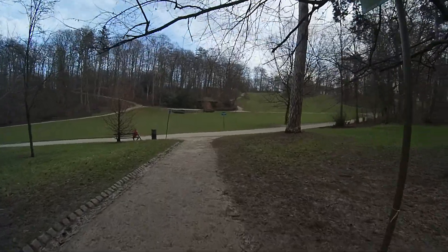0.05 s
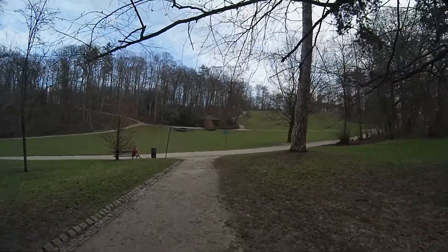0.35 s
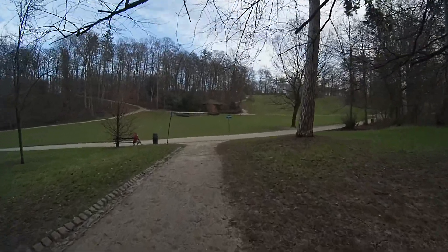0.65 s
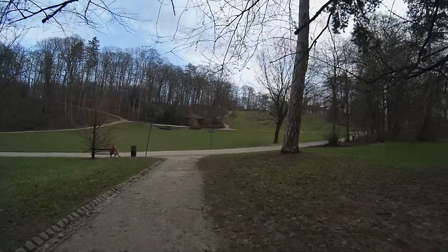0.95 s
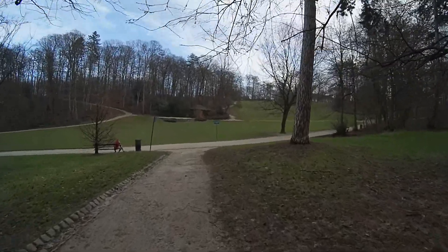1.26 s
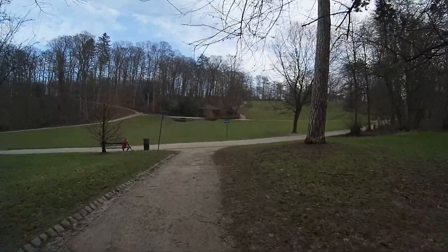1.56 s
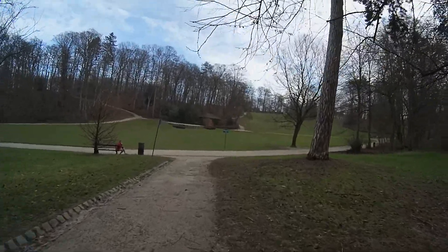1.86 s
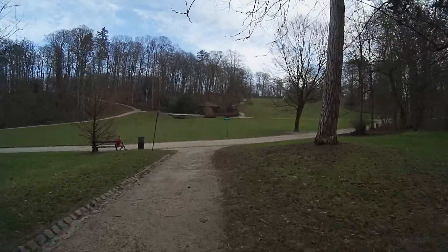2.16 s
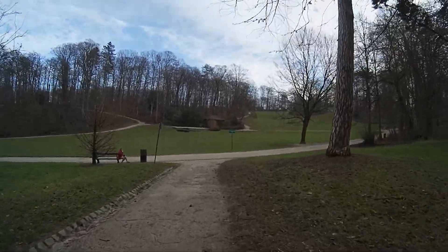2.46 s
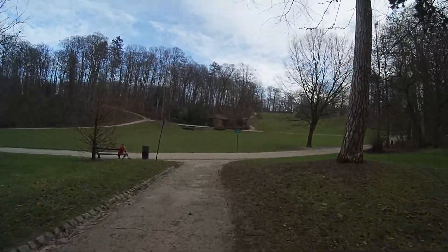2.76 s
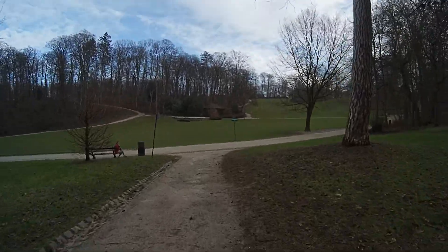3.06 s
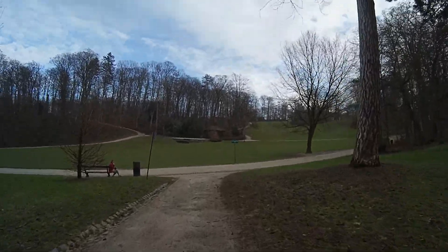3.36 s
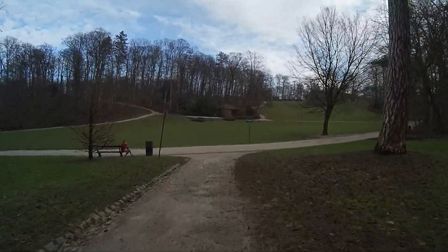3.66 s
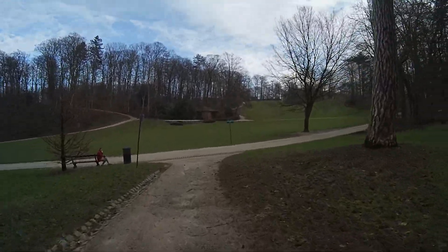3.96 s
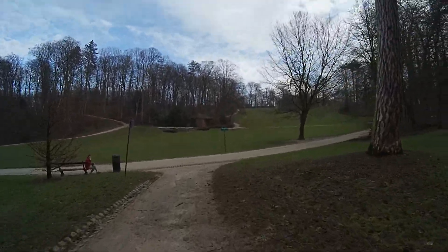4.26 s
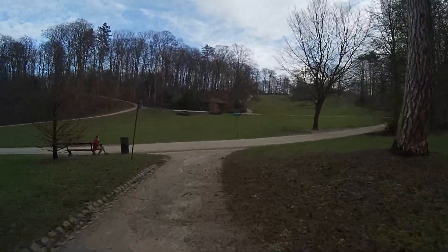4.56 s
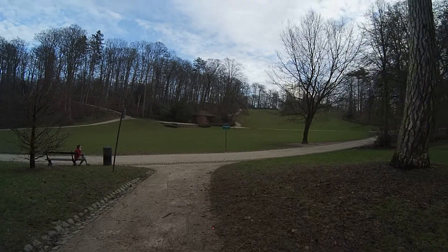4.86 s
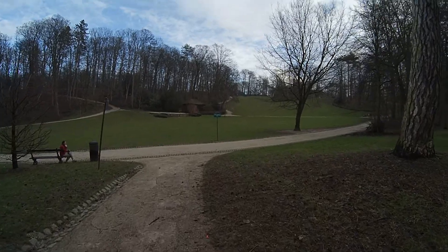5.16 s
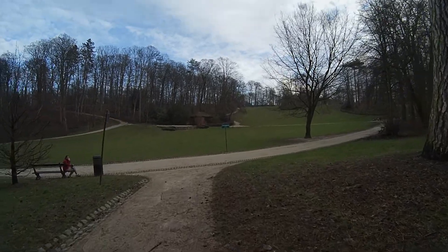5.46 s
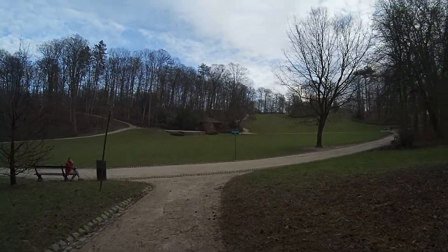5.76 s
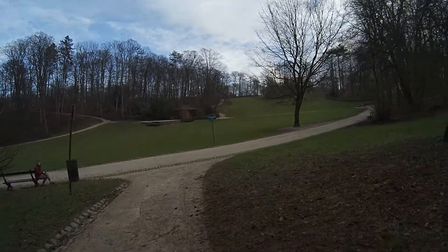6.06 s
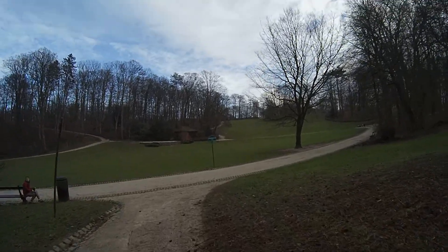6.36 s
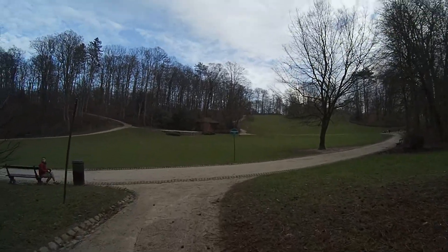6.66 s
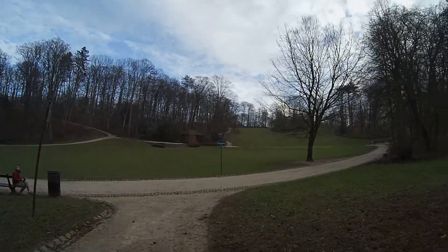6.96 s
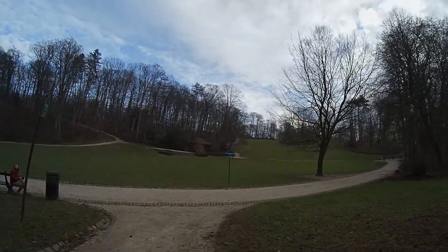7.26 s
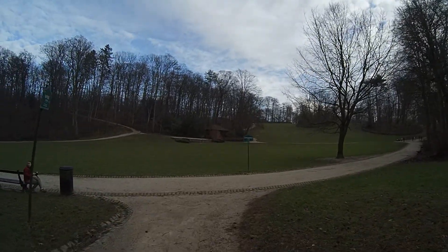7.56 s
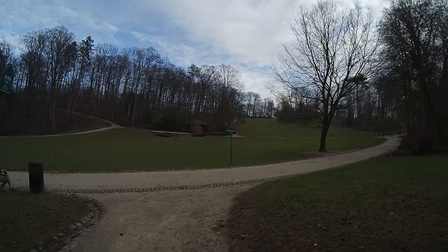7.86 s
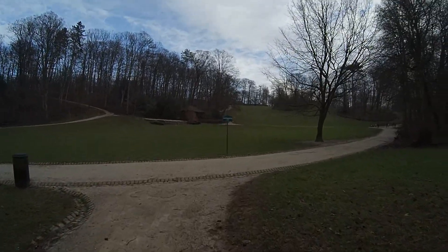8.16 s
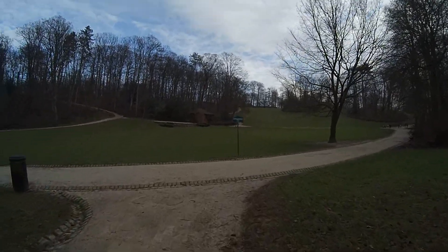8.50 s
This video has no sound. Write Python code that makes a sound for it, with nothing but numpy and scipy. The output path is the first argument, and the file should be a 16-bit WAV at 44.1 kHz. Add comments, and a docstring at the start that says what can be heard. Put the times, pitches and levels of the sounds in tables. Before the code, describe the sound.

Parakeets squawk harshly nearby in a quiet park, over faint footsteps on gravel, a swishing jacket and low wind rumble.

```python
"""Parakeets squawk close by in a quiet park, starting about four seconds in. Pulses and puffs of air ring
each bird's throat: most calls open with rattling chucks, hold a harsh note, then arch up and fall.
All along, someone walks down a gravel path, jacket swishing and faintly squeaking with the steps.
Farther off, more of the flock chatters and a bird hoots twice. Air rumbles on the microphone over a
low drone, and a soft, breath-like rush swells and fades about every three seconds."""
import sys
import numpy as np
from scipy import signal
from scipy.fft import rfft, irfft, next_fast_len
from scipy.io import wavfile
from scipy.ndimage import uniform_filter1d

SR = 44100
rng = np.random.default_rng(int(sys.argv[2]) if len(sys.argv) > 2 else 0)


def store_wav(level_fs):
    """Save 16-bit WAV to argv[1]."""
    pcm = np.round(np.clip(np.atleast_2d(level_fs), -1, 1) * 32767)
    wavfile.write(sys.argv[1], SR, pcm.T.astype(np.int16))


N = 376173
TIME = np.arange(N) / SR

# The near calls. Each row: start, hold, rise and fall in seconds, held and top pitch in Hz, held and
# arch level in dB, roughness from 0 to 1, whistle in dB, warble as a share of the pitch, then the
# lead-in chucks: how many, their spacing in seconds, their level in dB.
SQUAWKS = [ (4.716, 0.024, 0.011, 0.012, 1220, 1182, -30.5, -33.5, .15, 6, .015, 6, 0.014, -27.5),
           (5.038, 0.053, 0.05, 0.039, 1312, 2150, -29, -31, .1, 4, 0.0082, 3, 0.013, -29.5),
           (5.384, 0.049, 0.073, 0.046, 1260, 2080, -30, -33.5, 0.12, 6.5, 0.01, 3, 0.015, -32.5),
           (5.681, 0.085, 0.045, 0.049, 1316, 2015, -34.5, -37.5, 0.09, -3, 0.016, 2, 0.015, -33.5),
           (5.98, 0.042, 0.091, 0.03, 1307, 1920, -34, -33, .18, 10.5, 0.023, 3, 0.016, -34.5),
           (6.244, .077, 0.054, 0.044, 1345, 1897, -34, -33.5, 0.24, 7, 0.014, 2, .012, -52),
           (6.552, .069, 0.041, 0.05, 1343, 1905, -33.5, -39, 0.22, 2, 0.013, 0, .018, -40),
           (6.87, 0.074, .028, .042, 1376, 1930, -33.5, -33.5, 0, -1, 0.012, 3, .0135, -29.5),
           (7.162, 0.074, 0.055, .048, 1340, 2062, -29, -28.5, 0, -3, 0.0059, 3, 0.012, -28),
           (7.489, .084, .04, 0.052, 1405, 2060, -27, -28, 0.06, -0.5, 0.035, 2, 0.015, -24),
           (7.803, 0.08, 0.038, 0.08, 1339, 1920, -27, -27, 0.09, 2, 0.033, 3, 0.017, -30.5),
           (8.113, 0.098, 0.058, 0.044, 1305, 1908, -26.5, -31.5, 0.21, 2, 0.023, 2, 0.014, -30.5),
           (8.433, 0.11, .045, .05, 1284, 1950, -30, -30, 0.2, 19, 0.029, 3, .012, -32), ]
# A bird's throat as heard from far off. Each row: frequency in Hz, gain in dB.
FAR_THROAT = [(1000, -10), (1600, -2.5), (2600, 4.5), (4000, 3.5), (6400, -2.5), (9000, -8.5), (15000, -23)]


def gain_of(db):
    """Turns decibels into a number to multiply by."""
    return np.exp(np.asarray(db) * (np.log(10) / 20))


def evened(x):
    """Scales a signal to an average power of 1."""
    return x / np.sqrt(np.mean(x ** 2) + 1e-20)


def read(points, hz):
    """Looks up a table by frequency, giving each octave equal room."""
    f, value = np.transpose(points)
    return np.interp(np.log(hz + 1), np.log(f + 1), value)


def level(rows):
    """Turns rows of seconds and dB into a gain for every sample."""
    return gain_of(np.interp(TIME, *np.transpose(rows)))


def add(mix, start, sound):
    """Mixes a sound in at a start time in seconds."""
    part = mix[max(round(start * SR), 0):][:len(sound)]
    part += sound[:len(part)]


def wander(size, hz):
    """A smooth random wobble, up to about hz times a second."""
    padded = next_fast_len(size + 512)
    f = np.fft.rfftfreq(padded, 1 / SR)
    return evened(irfft(rfft(rng.standard_normal(padded)) / (1 + (f / hz) ** 4), padded))[:size]


def noise(spectrum, patchy_db):
    """Noise of a given tone colour whose level drifts in patches of time and frequency."""
    hz = np.fft.rfftfreq(2048, 1 / SR)
    real, imag, patches = rng.standard_normal((3, len(hz), N // 512 + 5))
    patches = evened(uniform_filter1d(uniform_filter1d(patches, size=20, axis=0), size=5, axis=1))
    frames = (real + 1j * imag) * gain_of(read(spectrum, hz)[:, None] + patchy_db * patches)
    return evened(signal.istft(frames, nperseg=2048, noverlap=1536)[1][:N])


def ring(spectrum, size=1024):
    """How a hollow space with this tone colour rings after one tap."""
    log_gain = np.log(gain_of(read(spectrum, abs(np.fft.fftfreq(size, 1 / SR)))))
    return np.fft.ifft(np.exp(np.conj(signal.hilbert(log_gain)))).real[:size // 4]


def park(sound):
    """Scattered echoes from trunks and ground; the highest treble dies first."""
    # Each row: frequency in Hz, seconds for the echoes to fade by 60 dB.
    fade_times = [(500, 0.13), (3000, 0.19), (6000, 0.31), (12000, 0.034)]
    echoes = rng.standard_normal(SR) * (rng.random(SR) < .06)
    hz, t, frames = signal.stft(echoes, SR, nperseg=256)
    frames = frames * gain_of(-60 * t / read(fade_times, hz)[:, None]) * (t > .004)
    tail = signal.istft(frames, SR, nperseg=256)[1]
    return signal.fftconvolve(sound, tail / np.linalg.norm(tail))[:N]


def air(air_db=-40, hum_hz=200, hum_db=-61):
    """Gusty rumble, a soft breath-like rush, a low drone and a faint wavering hum."""
    # Tone colour of the air. Each row: frequency in Hz, relative level in dB.
    colour = [(15, 2.5), (27, 1.5), (42, -1), (60, -7), (80, -9.5), (100, -18), (150, -18), (250, -23.5),
              (400, -26.5), (700, -28.5), (1200, -31), (2500, -36), (4500, -40.5), (8000, -47),
              (15000, -58.5)]
    # The breeze comes and goes. Each row: time in seconds, lift of the rumble in dB.
    gusts = [(0, 3), (1.35, 4), (1.47, 9.5), (1.65, 1), (2.0, 5.5), (2.15, -3), (2.33, 6.5), (3.0, 1.5),
             (4.35, 5), (5.23, 1.5), (5.44, 8.5), (5.7, 4), (5.9, 5), (6.45, 2), (7.39, 7.5), (7.65, -1),
             (8.25, 3), (8.42, 9)]
    # The rush swells and fades about every three seconds. Each row: time in seconds, level in dB.
    rush_levels = [(0, -65), (.12, -54), (1.3, -54), (1.8, -60.5), (2.5, -60), (3.1, -55.5), (3.65, -55),
                   (4.25, -58.5), (4.9, -61.5), (5.3, -66.5), (5.75, -59), (5.92, -52), (6.45, -59),
                   (8.5, -55)]
    # The low drone. Each row: time in seconds, level in dB.
    drone_levels = [(0, -56), (1.4, -58), (1.8, -63), (3.2, -57), (3.8, -52.5), (4.25, -51), (4.6, -63)]
    background = gain_of(air_db) * noise(colour, patchy_db=2.0)
    rumble = signal.sosfiltfilt(signal.butter(2, 140, fs=SR, output="sos"), background)
    rush = signal.sosfiltfilt(signal.butter(2, [480, 950], "band", fs=SR, output="sos"), background)
    drone_band = signal.butter(3, [80, 150], "band", fs=SR, output="sos")
    drone = evened(signal.sosfilt(drone_band, rng.standard_normal(N)))
    hum = np.sin(2 * np.pi * np.cumsum(hum_hz + 4 * wander(N, 10.9)) / SR)
    hum *= gain_of(2.5 * wander(N, 5))
    # swap the steady rumble and rush for swelling ones
    swells = rumble * (level(gusts) - 1) + level(rush_levels) * evened(rush) - rush
    return background + swells + level(drone_levels) * drone + gain_of(hum_db) * hum


def hoots(echo=0.61):
    """A bird across the lawn gives two soft, nearly pure notes, blurred by the trees."""
    # Each row: start and length in seconds, pitch in Hz, level in dB.
    notes = [(3.525, 0.13, 1350, -52), (3.751, 0.12, 1337, -54.5)]
    out = np.zeros(N)
    for start, length, hz, db in notes:
        size = int(length * SR)
        turns = np.cumsum(hz * (1 + 0.036 * wander(size, 60))) / SR
        add(out, start, gain_of(db) * np.hanning(size) * np.sin(2 * np.pi * turns))
    return out + echo * park(out)


def voice(rows, throat, waver=0.01203, jitter=0.015, flutter_db=0.0, fade_s=.004):
    """Membrane pulses and puffs of air ring a bird's throat. Returns the start time and the sound."""
    # Each row: time in seconds, pitch in Hz, level in dB, roughness from 0 to 1 (shakes the pitch
    # and adds air), whistle in dB (lifts the second harmonic, an octave above the pitch).
    times, *columns = np.transpose(rows)
    t = np.arange(times.min() - fade_s / 2, times.max() + fade_s / 2, 1 / SR)
    hz, db, rough, whistle_db = (np.interp(t, times, column) for column in columns)
    rough, size = np.clip(rough, 0, 1), len(t)
    hz = hz * (1 + waver * (.5 + 2 * rough) * wander(size, 76.0) + jitter * rough * wander(size, 570))
    turns, pulses = np.cumsum(hz) / SR, np.zeros(size)
    moments = np.arange(t[0], t[-1] + .02, .009)
    for k in range(1, 13):
        # tongue and beak never hold still, so each harmonic swells and fades by itself
        shimmer_db = 3.6 * np.interp(t, moments, rng.standard_normal(len(moments)))
        clear = np.clip((15200 - k * hz) / 4500, 0, 1)  # the highest harmonics give way to hiss
        pulses += clear * gain_of(shimmer_db + whistle_db * (k == 2)) * np.cos(2 * np.pi * k * turns)
    puffs = (0.43 + np.cos(2 * np.pi * turns)) * rng.standard_normal(size)
    drive = (1 - rough) * evened(pulses) + (rough + 0.32) * evened(puffs)
    sound = signal.fftconvolve(drive, throat)[:size]
    # loudness follows the bird's effort, however strongly the throat rings
    sound /= np.sqrt(uniform_filter1d(2 * sound ** 2, size=300) + 1e-12)
    fade = np.clip(np.minimum(t - t[0], t[-1] - t) / fade_s, 0, 1)
    return t[0], sound * fade * gain_of(db + flutter_db * wander(size, 160))


def flock(count=44):
    """Far birds give arched calls at random, dulled and blurred by distance."""
    # Each row: time in seconds, level of the chatter in dB.
    chatter_levels = [(0, -64), (.9, -76), (1.25, -55), (2.3, -76), (2.9, -55.5), (4.0, -60), (4.42, -44.5),
                      (4.55, -52.5), (5.8, -50.5), (6.1, -43), (6.7, -44), (7.35, -52), (8.05, -47.5),
                      (8.35, -51)]
    out, throat = np.zeros(N), ring(FAR_THROAT)
    for k, (late, pitch) in enumerate(rng.random((count, 2))):
        start, hz = TIME[-1] * (k + late) / count, 1100 + 300 * pitch
        rows = [(start, .9 * hz, -3, .5, 0), (start + .07, hz, 0, .3, 2),
                (start + .13, 1.5 * hz, 0, .3, 5), (start + .19, hz, -4, .5, 0)]
        add(out, *voice(rows, throat))
    return evened(out + park(out)) * level(chatter_levels)


def far_calls(swell_db=11, peak_share=.62, glide=0.075, echo=0.14):
    """Short rising calls that swell and fade in the farther trees."""
    # Each row: start and length in seconds, pitch in Hz, level in dB, roughness, whistle in dB.
    calls = [(2.447, 0.055, 1275, -41.5, 0.55, 6), (2.647, 0.044, 1333, -43, 0.34, 7),
             (2.808, 0.11, 801, -38.5, 0.47, 5)]
    out, throat = np.zeros(N), ring(FAR_THROAT)
    for start, length, hz, db, *tone in calls:
        rows = [(start, hz * (1 - glide), db - swell_db, *tone),
                (start + peak_share * length, hz, db, *tone),
                (start + length, hz * (1 + glide), db - swell_db, *tone)]
        add(out, *voice(rows, throat))
    return out + echo * park(out)


def arm_swing(stride_s=0.99, roundness=0.81, skew=0.84, rest_db=-16):
    """How fast cloth slides on cloth: each arm's brush swells and dies away once a stride."""
    # Each row: one arm's first brush and its length in seconds, relative level in dB.
    arms = [(0.083, 0.3, 2), (0.405, 0.37, -0.5)]
    # How hard the jacket rubs. Each row: time in seconds, level in dB.
    rub_levels = [(0, -48.5), (.6, -55.5), (2.2, -54), (3.2, -55), (4.3, -53), (5.3, -55), (8.5, -58)]
    speed = np.full(N, gain_of(rest_db))
    for first, length, db in arms:
        progress = np.minimum((TIME - first) % stride_s / length, 1)
        speed += gain_of(db) * abs(np.sin(np.pi * progress ** skew)) ** roundness
    return speed * level(rub_levels)


def jacket(grain_db=1.5, squeak_waver=0.037):
    """Cloth rubs with a grainy hiss and now and then catches in a tiny squeak."""
    # Tone colour of the cloth. Each row: frequency in Hz, relative level in dB.
    cloth = [(300, -11.5), (1000, -9), (2500, -5.5), (4200, -7), (6000, -6), (8000, -4.5), (10000, -10.5),
             (12500, -14.5), (15500, -20)]
    # Each row: start and length in seconds, first and last pitch in Hz, level in dB.
    squeaks = [(0.088, 0.064, 4180, 4060, -43), (0.195, 0.077, 3020, 2580, -56),
               (.62, 0.035, 3100, 3190, -53.5), (1.109, 0.068, 5430, 4170, -50),
               (1.31, 0.097, 4800, 4660, -54), (1.597, 0.035, 4550, 4150, -48),
               (2.087, .04, 5700, 5300, -52), (2.56, 0.057, 3880, 4100, -46.5),
               (3.05, 0.042, 4600, 4900, -52), (3.602, 0.054, 4600, 5100, -50),
               (4.023, 0.035, 4800, 5080, -48.5)]
    out = noise(cloth, patchy_db=1.84) * arm_swing() * gain_of(grain_db * wander(N, 120))
    for start, length, start_hz, end_hz, db in squeaks:
        size = int(length * SR)
        hz = np.linspace(start_hz, end_hz, size) * (1 + squeak_waver * wander(size, 470))
        swell = gain_of(db + 3.0 * wander(size, 200)) * np.hanning(size)
        add(out, start, swell * np.sin(2 * np.pi * np.cumsum(hz) / SR))
    return out


def feet(thud_hz=300, thud_s=0.0058, snap_s=0.001, snap_grit=0.67):
    """Soles land with dull thuds; grit and twigs snap under them, barely ringing."""
    # Each row: start in seconds, level in dB.
    thuds = [(1.85, -43), (1.903, -40), (2.809, -48.5), (3.881, -44), (4.604, -37), (4.873, -38.5),
             (5.337, -42.5), (5.388, -37), (6.353, -40.5), (6.696, -38), (6.876, -39), (7.36, -37.5),
             (7.399, -38.5), (7.8, -38)]
    # Each row: start in seconds, level in dB, pitch in Hz.
    snaps = [(.955, -42, 3020), (1.041, -32, 1840), (1.4406, -22, 2030), (1.909, -42, 1400),
             (1.943, -40, 4420), (2.34, -39, 1700), (2.998, -36, 1610), (3.967, -34, 1710)]
    out, t = np.zeros(N), np.arange(SR // 10) / SR
    for start, db in thuds:
        hz = thud_hz * rng.uniform(0.69, 1.35)
        push = 0.8 * np.sin(2 * np.pi * hz * t) + 0.41 * wander(len(t), 1440)
        add(out, start, gain_of(db) * push * t / thud_s * 2 * np.exp(1 - 2 * t / thud_s))
    for start, db, hz in snaps:
        crack = np.sin(2 * np.pi * hz * t + snap_grit * wander(len(t), 2600))
        add(out, start, gain_of(db) * crack * np.exp(-t / snap_s))
    return out


def chuck_times(lead_s=.0113, first_early_s=0.0022, first_soft_db=-8):
    """Gives each chuck's time and level: a run before a squawk starts softly; rattles stand alone."""
    # Each row: start in seconds, number of chucks, spacing in seconds, first and last level in dB.
    rattles = [(4.316, 10, 0.018, -41, -39), (4.765, 3, 0.016, -30.5, -38.5), (4.815, 5, .0182, -40.5, -35),
               (6.433, 5, 0.025, -36, -34)]
    for start, *_, count, gap, db in SQUAWKS:
        for k in range(round(count)):  # counting back from the squawk
            first = k == round(count) - 1
            yield start - lead_s - k * gap - first_early_s * first, db + first_soft_db * first
    for start, count, gap, first_db, last_db in rattles:
        for k, db in enumerate(np.linspace(first_db, last_db, round(count))):
            yield start + k * gap, db


def chuck(middle, db, pitch_hz=1042, length_s=0.012, edge_ratio=1.07, rough=0.31):
    """Voice rows for a tiny burst that starts hard, dips in pitch and dies away."""
    hz = pitch_hz * (1 + 0.0357 * rng.standard_normal())
    db += 0.5 * rng.standard_normal()
    return [(middle - length_s / 2, hz * edge_ratio, db - 2, rough, 0),
            (middle, hz, db, rough, 0),
            (middle + length_s / 2, hz * edge_ratio, db - 7, rough, 0)]


def reply(start, length, start_hz, middle_hz, end_hz, start_db, end_db, rough, whistle_db=13):
    """Voice rows for one purer, smoothly bent note."""
    progress = np.linspace(0, 1, 20)
    pitches = np.polyval(np.polyfit([0, .5, 1], [start_hz, middle_hz, end_hz], 2), progress)
    return [(start + length * share, hz, start_db + (end_db - start_db) * share, rough, whistle_db)
            for share, hz in zip(progress, pitches)]


def squawk(start, hold, rise, fall, held_hz, top_hz, held_db, arch_db, rough, whistle_db, warble):
    """Voice rows for a call that scoops up to a held note, arches over and ends below it."""
    scoop_from, fall_to = .81, .76  # shares of the held pitch
    scoop_s, roundness, fall_curve, warble_hz = .42 * hold, .45, 1.3, 55
    onset_s, onset_db, sag_db, end_db = 0.01, 2.5, -2, -8.5
    t = np.arange(0, hold + rise + fall, .001)
    up, down = np.clip((t - hold) / rise, 0, 1), np.clip((t - hold - rise) / fall, 0, 1)
    held = held_hz * (1 - (1 - scoop_from) * np.exp(-t / scoop_s))
    hz = held + (top_hz - held) * (up + roundness * up * (1 - up))
    hz += (fall_to * held_hz - top_hz) * np.sin(np.pi / 2 * down) ** fall_curve
    hz *= 1 + warble * np.interp(t, TIME[:SR], wander(SR, warble_hz))
    # the voice opens loud and hoarse, settles, and turns hoarse again as it dies
    onset, arch = np.exp(-t / onset_s), np.sqrt(up)
    db = (1 - arch) * (held_db + sag_db * t / hold) + arch * arch_db
    db += onset_db * onset + end_db * down ** 2
    hoarse = rough + 0.31 * onset + 0.49 * down ** 2
    whistle = (1 - arch) * (0.62 * whistle_db - 4) + arch * whistle_db
    return np.transpose([start + t, hz, db, hoarse, whistle])


def parakeets():
    """The near birds squawk and reply with the beak open, and chuck with it half shut."""
    # The throat with the beak open. Each row: frequency in Hz, gain in dB.
    open_beak = [(1000, -23.5), (1600, -19), (2100, -10), (2620, 5), (3150, -3), (4250, 3), (5300, -3),
                 (6450, 1), (7600, -7), (9100, -8), (10500, -15), (12000, -20.5), (15000, -16.5)]
    # The throat with the beak half shut. Each row: frequency in Hz, gain in dB.
    half_shut_beak = [(1000, -34), (1600, -10), (2150, -3.5), (3100, -3), (4150, 7), (5200, -9),
                      (6200, -0.5), (7300, -7), (8600, -7), (10500, -15.5), (12000, -19.5), (15000, -17)]
    # A second bird cuts in. Each row: start and length in seconds, first, middle and last pitch
    # in Hz, first and last level in dB, roughness from 0 to 1.
    replies = [ (6.16, 0.051, 1240, 1390, 1820, -44, -50, .05),
               (6.511, 0.055, 1514, 1915, 1835, -39.5, -34, 0.48),
               (7.543, 0.03, 2140, 2140, 2130, -38, -33, 0),
               (8.186, 0.033, 1800, 2110, 2340, -34, -44, 0.3),
               (8.217, 0.032, 2067, 1826, 1290, -29.5, -34, 0.16),
               (8.457, 0.073, 1475, 2160, 2050, -30, -42.5, 0.34), ]
    out, throat, chuck_throat = np.zeros(N), ring(open_beak), ring(half_shut_beak)
    for row in SQUAWKS:
        add(out, *voice(squawk(*row[:-3]), throat, flutter_db=1.0))
    for row in replies:
        add(out, *voice(reply(*row), throat))
    for middle, db in chuck_times():
        add(out, *voice(chuck(middle, db), chuck_throat, fade_s=0.0013))
    return out


def scene(echo_db=-18, ground_db=-14, ground_s=.0075, width_db=-12):
    """Ground and trees throw the calls back; only the highest hiss spreads a little left and right."""
    birds = parakeets()
    mid = birds + gain_of(echo_db) * park(birds)
    mid += flock() + far_calls() + hoots() + jacket() + feet() + air()
    add(mid, ground_s, gain_of(ground_db) * birds)
    treble = signal.sosfilt(signal.ellip(8, 1, 70, 8300, "high", fs=SR, output="sos"), mid)
    side = gain_of(width_db) * treble * wander(N, 310)
    return np.array([mid + side, mid - side])


def record(dry, edge_hz=15500):
    """Cuts away the very highest treble."""
    low_pass = signal.firwin(511, edge_hz, window=("kaiser", 9), fs=SR)
    return signal.oaconvolve(dry, low_pass[None], "same")


dry = scene()
out = record(dry)
store_wav(out)
```